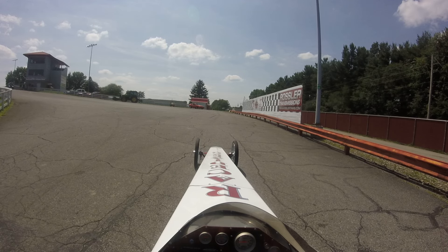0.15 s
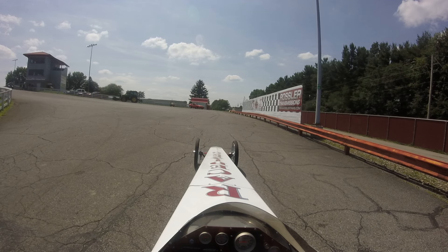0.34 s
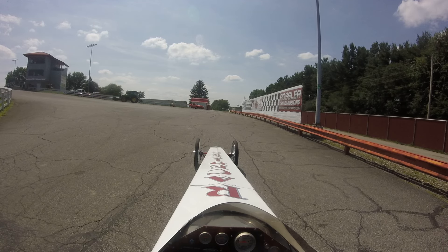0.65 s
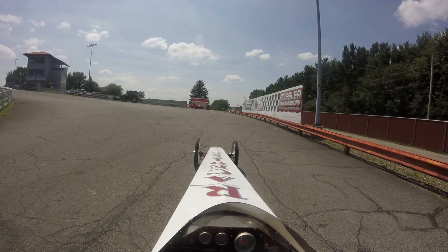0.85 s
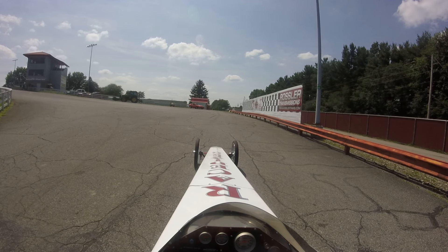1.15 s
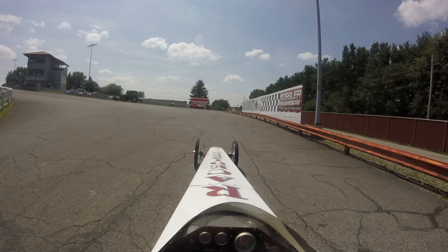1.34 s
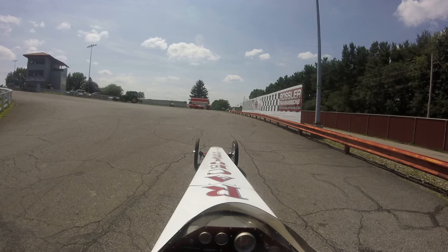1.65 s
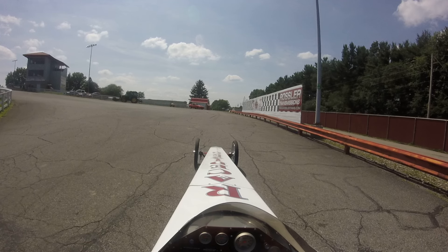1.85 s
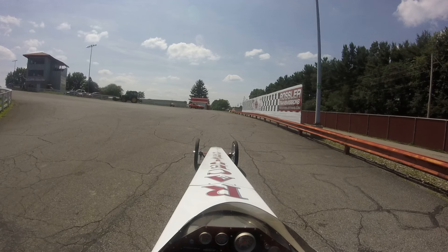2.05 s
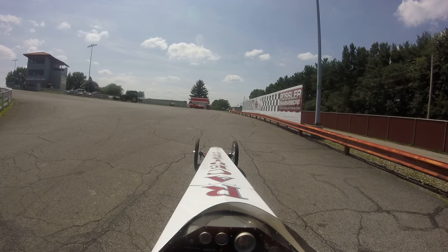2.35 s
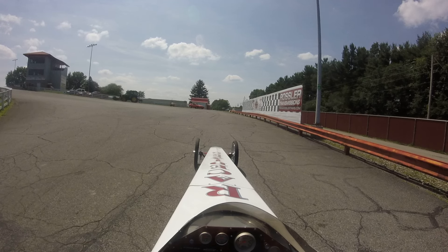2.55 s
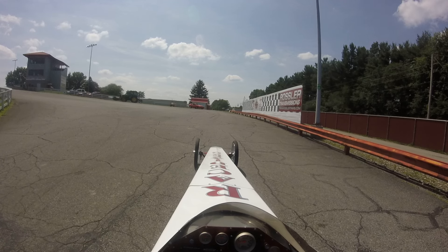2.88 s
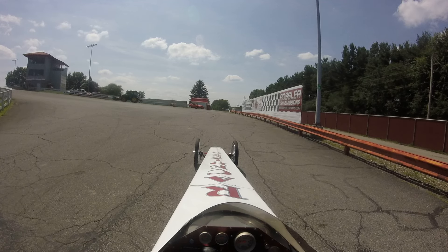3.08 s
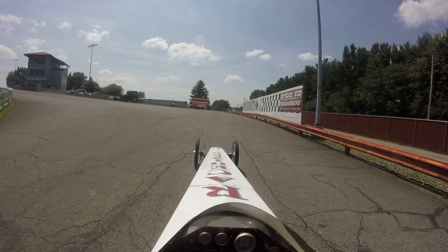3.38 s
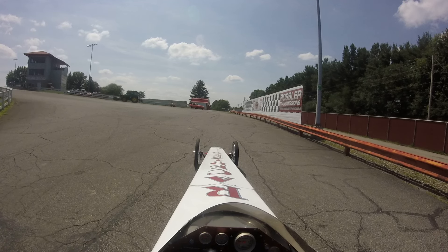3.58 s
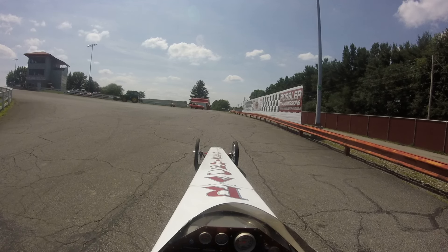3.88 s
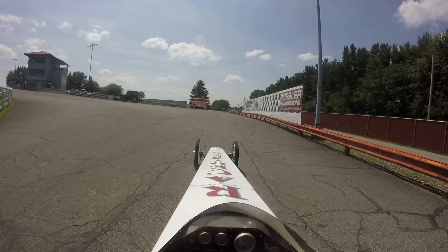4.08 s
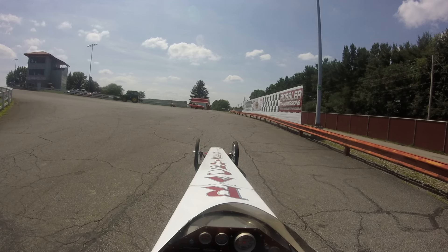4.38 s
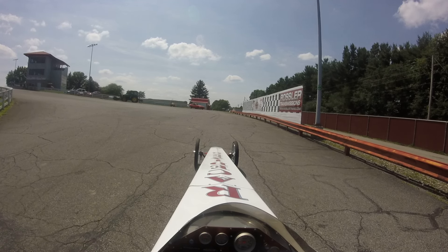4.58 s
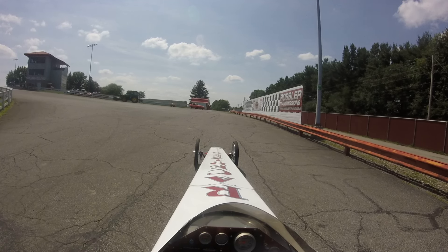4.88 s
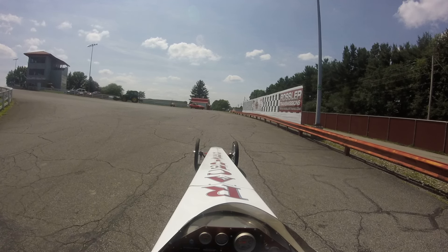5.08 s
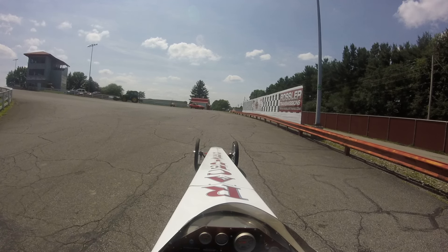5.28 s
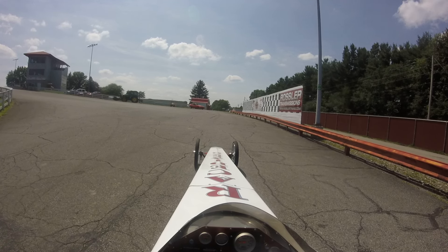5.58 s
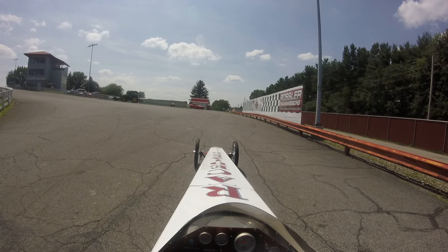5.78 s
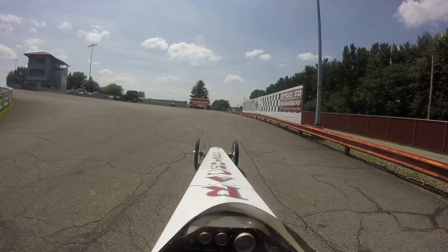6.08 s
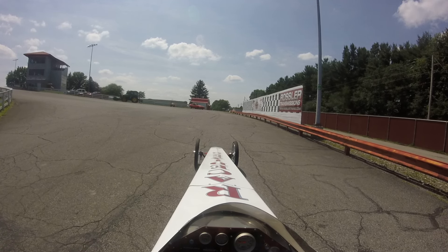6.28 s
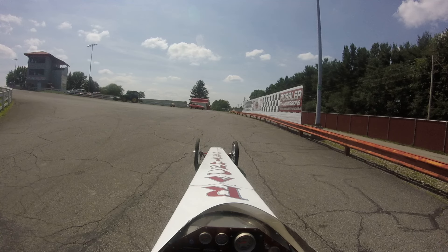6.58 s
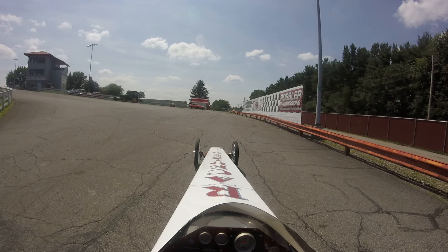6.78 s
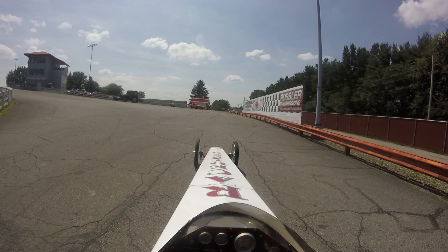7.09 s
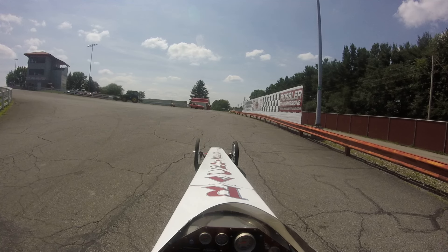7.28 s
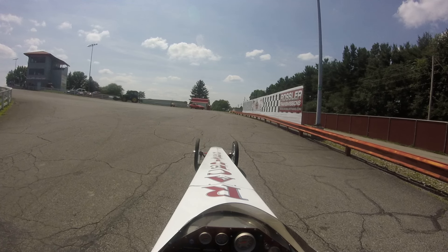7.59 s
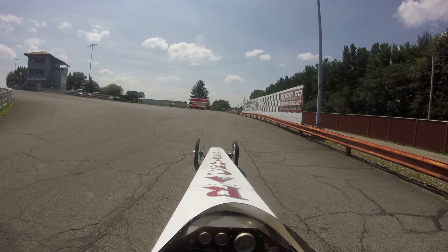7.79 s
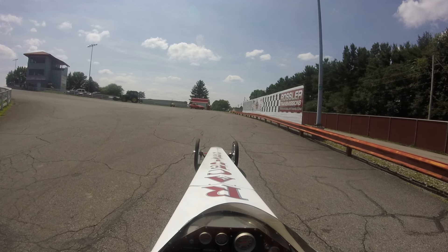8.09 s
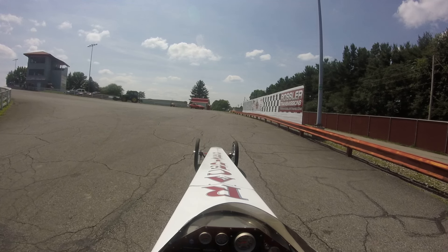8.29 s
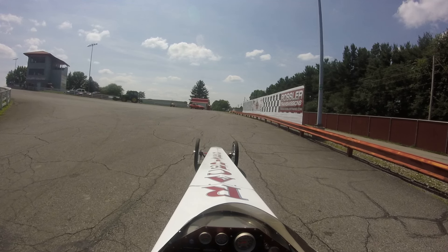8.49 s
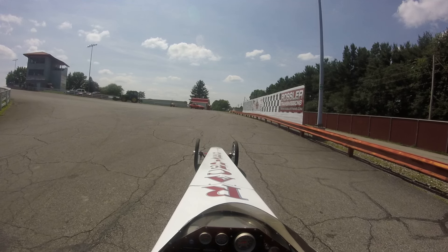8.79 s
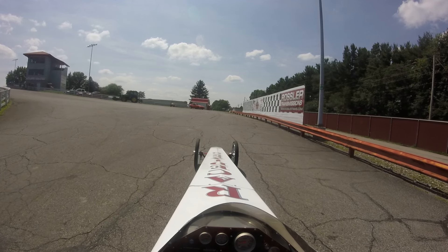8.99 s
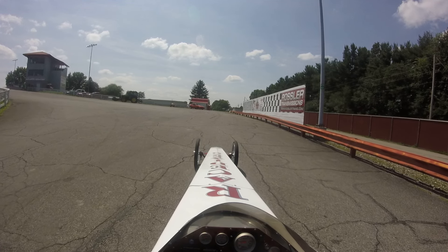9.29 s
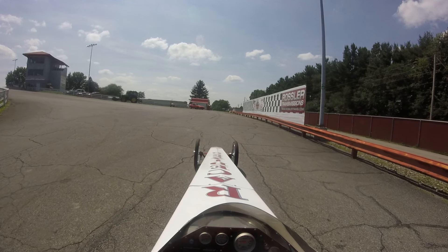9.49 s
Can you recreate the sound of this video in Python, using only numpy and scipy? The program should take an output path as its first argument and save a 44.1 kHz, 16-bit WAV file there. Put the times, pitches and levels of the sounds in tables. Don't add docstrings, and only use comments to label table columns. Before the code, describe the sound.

A racing engine starts at an open drag strip, heard through the car's frame. The starter spins up with pinion ticks and brushy hiss, squealing at each compression thump. The eight-cylinder engine fires, rises to a fast idle, sags, then picks up again at the end. Low throbbing, hard mid-range case rattle and sporadic metallic clinks are very close and dry; one knock momentarily quiets everything.

```python
import sys
import numpy as np
from scipy import signal
from scipy.fft import rfft, irfft, next_fast_len
from scipy.io import wavfile

SR = 44100
rng = np.random.default_rng(int(sys.argv[2]) if len(sys.argv) > 2 else 0)


def log_audio(samples):
    frames = np.atleast_2d(samples).T
    limited = np.clip(frames, -1, 1)
    pcm = np.round(limited * 32767).astype(np.int16)
    wavfile.write(sys.argv[1], SR, pcm)


def attenuation_scalar(level_db):
    decades = np.asarray(level_db, float) / 20
    return 10 ** decades


N = 425565
TIME = np.arange(N) / SR

# start_s, squeal_db, squeal_length_s, frame_thud_db
COMPRESSION_STROKES = [(0.578, -14.5, 0.004, -28), (0.608, -15, 0.0046, -13), (.632, -22, 0.016, -30),
                       (0.804, -19.5, 0.056, -19), (0.838, -16, 0.01, -30), (1.015, -17.5, 0.025, -16),
                       (1.149, -17.5, 0.027, -7.5), (1.271, -17.5, 0.02, -5.5), (1.389, -18, 0.021, -10),
                       (1.507, -19.5, 0.024, -15), (1.625, -20, 0.027, -11.5)]


def rms_one(x):
    return x / np.sqrt(np.mean(x ** 2) + 1e-20)


def in_time(rows):
    s, *columns = np.transpose(rows)
    return [np.interp(TIME, s, c) for c in columns]


def drift(rate):
    knots = rng.standard_normal(round(N / SR * 400))
    r = np.exp(-2 * np.pi * rate / 400)
    wander = rms_one(signal.lfilter([1], [1, -2 * r, r * r], knots))
    return np.interp(TIME * 360, np.arange(len(knots)), wander)


def lowpass(x, order, hz):
    return signal.sosfilt(signal.butter(order, hz, fs=SR, output="sos"), x)


def highpass(x, order, hz):
    return signal.sosfilt(signal.butter(order, hz, "high", fs=SR, output="sos"), x)


def colour(x, spectrum):
    size = next_fast_len(N)
    hz, level_db = np.transpose(spectrum)
    at = np.log(np.arange(size // 2 + 1) * SR / size + 1)
    gain = attenuation_scalar(np.interp(at, np.log(hz), level_db, left=-120, right=-120))
    return irfft(rfft(x, size) * gain, size)[:N]


def resonate(x, hz, width):
    r = np.exp(-np.pi * width / SR)
    poles = [1, -2 * r * np.cos(2 * np.pi * hz / SR), r * r]
    return signal.lfilter(np.array([1, 0, -1]) * (1 - r * r) / 2, poles, x)


def modes(shake, table):
    out = 0
    for k, (hz, width, level_db) in enumerate(table):
        once = resonate(shake, hz, width * 1.63)
        out = out + (-1) ** k * attenuation_scalar(level_db) * resonate(once, hz, width * 1.32)
    return out


def ring(clicks, hz, t60):
    r = attenuation_scalar(-60 / (t60 * SR))
    w = 2 * np.pi * hz / SR
    return signal.lfilter([0, np.sin(w)], [1, -2 * r * np.cos(w), r * r], clicks + 1e-18)


def clicks_at(times, sizes):
    out = np.zeros(N)
    np.add.at(out, np.clip(np.asarray(times) * SR, 0, N - 1).astype(int), sizes)
    return out


def bursts(times, sizes, decay_s, floor):
    shape = signal.lfilter([1], [1, -np.exp(-1 / (decay_s * SR))], clicks_at(times, sizes))
    return (floor + shape) * rng.standard_normal(N)


def distant_engine():
    fade = attenuation_scalar(np.interp(TIME, [0, .16, .3], [-14, -14, -60]))
    return fade * modes(rng.standard_normal(N), [(370, 22, 0.0023), (185, 60, -6.5)])


def frame_modes(force):
    # pitch_hz, level_db, t60_s
    tubes = [(65.7, -8, 0.48), (72.65, 5, 0.64), (101.9, -8.5, 0.74)]
    soft = lowpass(force, 4, 115)
    return sum(attenuation_scalar(level_db) * ring(soft, hz, t60) for hz, level_db, t60 in tubes)


def blows():
    # start_s, level_db
    jolts = [
        (.672, -13.5),
        (0.76, -18),
        (.879, -51),
        (2.21, -22),
        (3.246, -17),
        (4.07, -18),
        (4.862, -36),
        (6.121, -12),
    ]
    # start_s, level_db, pitch_hz, t60_s
    knock_modes = [
        (3.528, -9, 1008, 0.049),
        (3.529, -3.5, 2900, 0.0089),
        (3.5309, -4, 1740, 0.031),
        (3.532, -1.5, 2610, 0.0055),
        (3.528, -17, 4500, 0.011),
        (3.532, -16, 4200, .008),
    ]
    strokes, thuds = np.array(COMPRESSION_STROKES), np.array(jolts)
    lag_s = -.012
    push = lowpass(clicks_at(strokes[:, 0] + lag_s, attenuation_scalar(strokes[:, 3] + 1.5)), 6, 85)
    thumps = ring(push, 67.7, 0.27)
    jolting = frame_modes(clicks_at(thuds[:, 0], attenuation_scalar(thuds[:, 1])))
    knock = sum(ring(clicks_at([s], attenuation_scalar(level_db)), hz, t60) for s, level_db, hz, t60 in knock_modes)
    return thumps + jolting + lowpass(knock, 4, 4500)


def spin_up():
    begin_s, end_s = 0.14, 0.59
    return np.clip(np.minimum(TIME - begin_s, end_s - TIME) / 0.081 + .5, 0, 1)


def stroke_squeals():
    upper_db, upper_loss_db_per_s = 9, 242
    out = np.zeros(N)
    grit = attenuation_scalar(3.1 * drift(73))
    low_rasp = rms_one(modes(rng.standard_normal(N), [(1320, 110, 0.)]))
    high_rasp = rms_one(modes(rng.standard_normal(N), [(2550, 190, 0.)]))
    for s, low_db, length_s, _ in COMPRESSION_STROKES:
        high_db = low_db + upper_db - upper_loss_db_per_s * length_s
        part = slice(round((s - .12) * SR), round((s + .12) * SR))
        t = TIME[part] - s
        swell = np.exp(-(t / length_s) ** 2) * grit[part]
        phase = 2 * np.pi * (t - 1.15 * t * t)
        low = np.sin(1345 * phase) + .5 * np.sin(1245 * phase) + 0.5 * low_rasp[part]
        high = 0.43 * np.sin(2500 * phase) + 0.51 * high_rasp[part]
        out[part] += swell * (attenuation_scalar(low_db) * low + attenuation_scalar(high_db) * high)
    return out


def starter():
    # start_s, mesh_hz, hiss_db (brush hiss follows the load)
    motor = [
        (0.0, 110, -47.5),
        (.2, 171.5, -35.5),
        (.33, 222, -26.5),
        (.5, 325, -22),
        (.7, 366, -21),
        (.95, 393, -27),
        (1.75, 394, -26.5),
        (2.22, 355, -28),
        (2.27, 364, -55),
    ]
    # pitch_hz, level_db (per Hz)
    hiss_spectrum = [(88, -45), (150, -13.5), (327, -11), (1000, -18), (1120, -16), (1770, -2.5),
                     (2490, -14.5), (3310, -8.5), (4080, -23.5), (6310, -30), (14000, -85)]
    # multiple of mesh_hz, level_db
    partials = [(.65, -4.5), (.875, -8), (1.001, -2), (1.25, -7.5), (1.498, -7.5), (2.0, -10)]
    # pitch_hz, width_hz, level_db
    housing = [(250, 28, -6.5), (522, 9.8, -18.5), (4650, 150, -21.5), (6290, 200, -15.5),
               (8150, 400, -32.5), (10850, 590, -41)]
    # start_s, peak_db
    pinion = np.array([(0.012, -36), (0.039, -34), (0.1491, -43), (0.196, -31), (0.212, -27), (0.2514, -31),
                       (0.2914, -40), (0.3155, -24), (0.338, -23), (0.3956, -23.5), (0.4514, -23),
                       (0.5494, -15.5)])

    mesh_hz, hiss_db = in_time(motor)
    turns = np.cumsum(mesh_hz) / SR
    whine_db = hiss_db - 11.5 + 7 * spin_up()
    whine = sum(attenuation_scalar(level_db + 3.1 * drift(6.2)) * np.sin(2 * np.pi * k * turns) for k, level_db in partials)
    whine = signal.sosfilt(signal.butter(4, [215, 570], "band", fs=SR, output="sos"), whine)

    throb = 1 + .5 * np.sin(2 * np.pi * turns * 0.34)
    brushes = throb * rng.standard_normal(N)
    hiss = rms_one(colour(brushes, hiss_spectrum)) + attenuation_scalar(12) * modes(brushes, housing)

    teeth = bursts(pinion[:, 0], attenuation_scalar(pinion[:, 1] + 27.0), 0.0014, 0)
    ticks = modes(teeth, [(3550, 600, -13)] + housing[2:])

    overrun_s, overrun_length_s, overrun_db = 1.79, 0.11, -34
    overrun = attenuation_scalar(overrun_db) * np.exp(-((TIME - overrun_s) / overrun_length_s) ** 2)
    sizzle = overrun * modes(brushes, [(8540, 900, 0.)])
    return attenuation_scalar(whine_db) * whine + attenuation_scalar(hiss_db) * hiss + ticks + sizzle + stroke_squeals()


def clinks():
    # start_s, peak_db, pitch_hz
    touches = [(2.391, -28, 5750), (2.4839, -27, 5960), (2.5826, -27, 5700), (2.659, -33, 5785),
               (2.906, -24, 6000), (2.9997, -28, 5900), (3.1963, -28, 5400), (3.2357, -28, 5900),
               (3.4622, -25, 5790), (4.0342, -29, 5676), (4.402, -20, 5814), (4.4679, -28, 5170),
               (5.0956, -28, 5290), (5.262, -26, 5980), (5.3205, -17, 4900), (5.5784, -29, 5850),
               (6.0708, -18, 5870), (6.3995, -29, 7772), (6.827, -31, 9080), (7.1448, -29, 5423),
               (7.517, -32, 8300), (7.8153, -26, 8040), (8.0238, -30, 8370), (8.0817, -30, 7400),
               (8.1416, -31, 5640), (8.6788, -31, 9050), (8.7836, -21, 5500), (9.0325, -25, 5900),
               (9.6142, -23, 7000)]
    out = np.zeros(N)
    spread = rng.uniform(0.35, 1.3, (len(touches), 5))
    for (s, peak_db, hz), ratios in zip(touches, spread):
        i = round(s * SR)
        t = TIME[:min(1500, N - i)]
        tone = np.sin(2 * np.pi * hz * t)
        tone = tone + .5 * np.sin(2 * np.pi * hz * np.outer(ratios, t)).sum(0)
        envelope = attenuation_scalar(-60 * t / 0.042) * np.minimum(t / 0.0012, 1)
        out[i:i + len(t)] += attenuation_scalar(peak_db - 9.5) * tone * envelope
    return out


def stray_clinks():
    touches_per_s, t60_s = 75, 0.017
    born = (rng.random(N) < touches_per_s / SR) * attenuation_scalar(2.3 * np.minimum(rng.exponential(1, N), 3))
    dealt = rng.integers(0, 12, N)
    pitches_hz = np.geomspace(5300, 10000, num=12)
    return rms_one(sum(ring(born * (dealt == k), hz, t60_s) for k, hz in enumerate(pitches_hz)))


def loose_parts(fired, pattern, chance, running):
    # pitch_hz, level_db (per Hz)
    spectrum = [(2650, -32), (4500, 6), (4990, -6), (5390, -4), (6300, -3), (8080, 0), (9240, -2),
                (11600, -13), (14700, -15), (15500, -37)]
    rattle_sizes = attenuation_scalar(.5 * pattern + 8.6 * np.minimum(chance[3], 1.8))
    rattle = bursts(fired + 0.0024 * np.abs(chance[0]), rattle_sizes, .0045, 0.68)
    body = rms_one(lowpass(rattle, 2, 10500))
    snap_sizes = attenuation_scalar(6 * np.minimum(-chance[2], 1.6))
    snaps = bursts(fired + .003 * np.abs(chance[1]), snap_sizes, .0015, .35)
    snaps = rms_one(highpass(snaps, 4, 8800))
    both = (body + attenuation_scalar(-4) * running * snaps) * attenuation_scalar(1.76 * drift(11.0))
    return rms_one(colour(both, spectrum)) + running * attenuation_scalar(-14) * stray_clinks()


def case_panels(fired, pattern, chance, shake):
    # pitch_hz, width_hz, level_db
    panel_modes = [(516, 86, -17.5), (1251.7, 68, -2.5), (1351, 55, -1), (2005.5, 59, -7.5), (2084, 41, -1),
                   (2275, 64, -3.5), (2364, 48, -1), (2499, 121, 1.5), (2788, 180, -4.5),
                   (3107, 197, -14.5), (3644, 365, -19.5), (4187, 176, -19), (4500, 43, -54),
                   (5390, 99, -38), (5980, 180, -30)]
    # pitch_hz, level_db (per Hz)
    wall = [(120, -13), (240, -25), (370, -29.5), (500, -21), (1000, -19), (1800, -16.5), (3300, -26),
            (3900, -41), (5000, -35), (9000, -67)]
    # pitch_hz, width_hz
    notches = [(1268, 30), (3920, 195), (4410, 59), (5120, 160)]
    blow = attenuation_scalar(1.55 * pattern + 1.0 * chance[1])
    push = bursts(fired, blow, .005, .25) + 30 * clicks_at(fired, blow * np.sign(chance[2]))
    low = modes(push, panel_modes[:3])
    high = modes(shake, panel_modes[3:]) + colour(shake, wall)
    panels = rms_one(low) * attenuation_scalar(-5.5) + rms_one(high) * attenuation_scalar(-2)
    for hz, width in notches:
        panels = panels - resonate(panels, hz, width)
    return panels


def firing_note(turns, per_s, running):
    # pitch_hz, level_db
    mount = [(57, -31), (65, -16), (72.5, -7.5), (79, -17.5), (84, -15.5), (92, -15.5), (101, -21.5),
             (116, -31.5)]
    note_db = np.interp(per_s, *np.transpose(mount)) + 2.6 * drift(11.7)
    return np.sqrt(2) * running * attenuation_scalar(note_db) * np.sin(2 * np.pi * turns)


def engine():
    # start_s, firings_per_s, case_shaking_db
    speed = [(1.75, 56.7, -17), (1.95, 65.7, -18.5), (2.1, 64.2, -18), (2.19, 69.4, -19.5),
             (2.44, 75.4, -21.5), (2.52, 85, -20.5), (2.7, 96, -20.5), (3.0, 103.7, -19.5), (4.68, 99, -17),
             (5.4, 103.6, -16.5), (6.12, 99, -17.5), (6.25, 93.7, -19.5), (6.55, 84.5, -20.5),
             (6.95, 85, -20), (7.3, 88.5, -19.5), (8.65, 84.5, -19.5), (9.1, 94, -18), (9.65, 110.3, -18)]
    # start_s, level_db
    cranking = [
        (0, -35),
        (.35, -11),
        (.5, -17),
        (.6, -1),
        (.78, -4),
        (.88, -9.5),
        (1.0, -4),
        (1.6, -7),
        (1.8, 0.5),
    ]
    cylinders = [4.5, -2.5, -4, 2.5, -.5, 2.5, -4, -2.5]

    per_s, panels_db = in_time(speed)
    panels_db = panels_db + in_time(cranking)[0]
    running = np.clip((TIME - 1.62) / 0.14, 0, 1)
    turns = np.cumsum(per_s * (1 + .012 * drift(6))) / SR
    note = firing_note(turns, per_s, running)

    fired = np.flatnonzero(np.diff(np.floor(turns))) / SR
    pattern = np.resize(cylinders, len(fired))
    chance = rng.standard_normal((4, len(fired)))
    uneven = attenuation_scalar(0.19 * pattern + 6.1 * np.minimum(chance[0], .9))
    frame = rms_one(frame_modes(clicks_at(fired, uneven - uneven.mean())))
    lumpy_db = running * 0.087 * (85.3 - per_s)
    lumpy_db = lumpy_db + (1 - running) * 2
    frame_db = np.maximum(panels_db - 2 + lumpy_db + 1.1 * drift(1.5), -27)

    shake = bursts(fired, attenuation_scalar(0.87 * pattern + 2.7 * chance[2]), 0.015, 0.88)
    panels = case_panels(fired, pattern, chance, shake)
    loose = loose_parts_db = -30
    loose = attenuation_scalar(loose_parts_db) * loose_parts(fired, pattern, chance, running)

    # pitch_hz, level_db (per Hz)
    rumble_spectrum = [(110, 13), (150, -5.5), (250, 6.0), (370, -11), (520, 6.5), (800, -23),
                       (1100, -19.0), (1500, -56)]
    rumble_gain = attenuation_scalar(panels_db - 24.5 + 2.2 * drift(1)) + attenuation_scalar(-34) * spin_up()
    rumble = rumble_gain * rms_one(colour(shake, rumble_spectrum))
    return note + attenuation_scalar(panels_db) * (panels + loose) + attenuation_scalar(frame_db) * frame + rumble


def scene():
    return (distant_engine() + blows() + starter() + clinks() + engine())[None]


def gain_control():
    duck_s, duck_db, creep_s = 3.537, -11.5, 0.53
    onset = np.clip((TIME - duck_s) / 0.0019 + 1, 0, 1)
    return attenuation_scalar(duck_db * np.exp(-np.abs(TIME - duck_s) / creep_s) * onset)


def low_pass(x):
    return signal.sosfilt(signal.butter(12, 15740, fs=SR, output="sos"), x)


def record(dry):
    heard = highpass(dry, 4, 52) * gain_control()
    ceiling = .945
    bent = np.tanh((np.abs(1.05 * heard) / ceiling) ** 3) ** (1 / 3)
    rounded = ceiling * bent * np.sign(heard)
    mix = lowpass(rounded, 8, 15300)
    return low_pass(mix)


dry = scene()
out = record(dry)
log_audio(out)
```